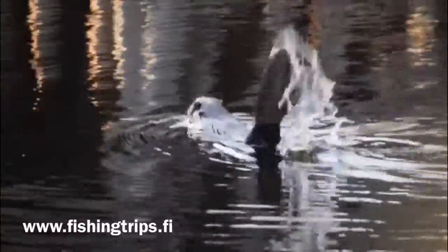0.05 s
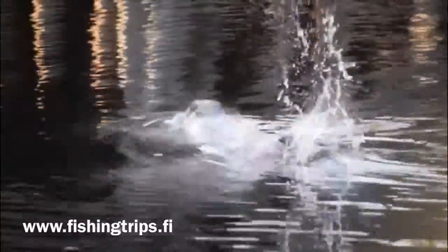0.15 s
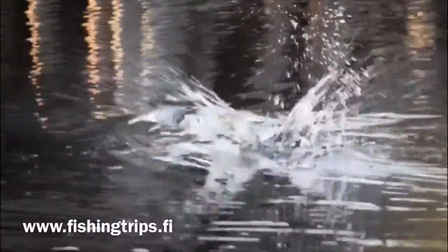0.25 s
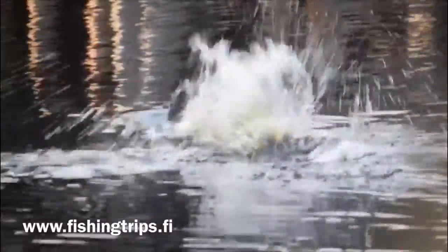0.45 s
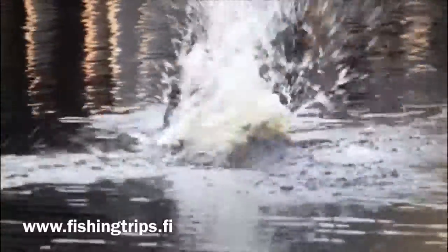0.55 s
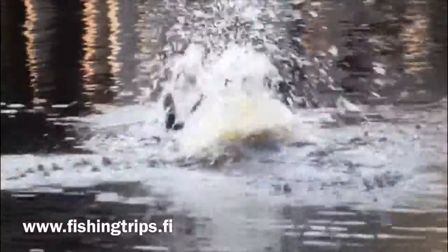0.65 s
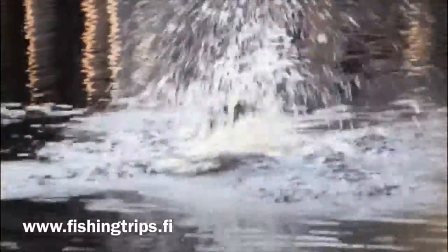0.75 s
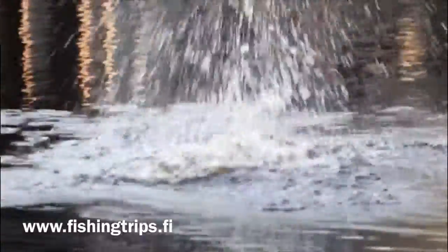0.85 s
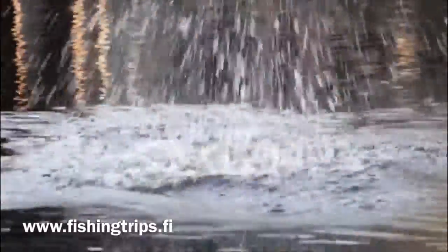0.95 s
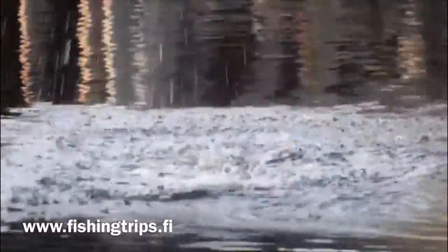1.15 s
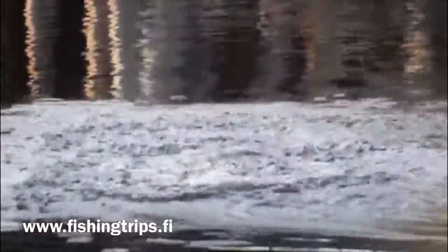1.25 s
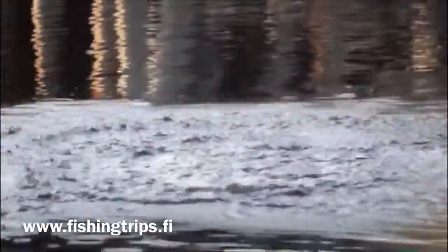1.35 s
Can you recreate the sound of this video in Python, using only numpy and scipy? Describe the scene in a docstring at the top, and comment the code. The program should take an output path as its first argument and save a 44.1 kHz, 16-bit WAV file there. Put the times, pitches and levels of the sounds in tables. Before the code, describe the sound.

One sharp slap on water as a beaver dives, then a plunge and spattering drops.

```python
"""Quiet air at a still pond: soft wind on the microphone, a few faint plunks, a small bird far off.
Then a beaver slaps its flat tail on the water, ringing the air trapped beneath, and dives.
The hollow it leaves closes with a rising gulp and the plunks of large bubbles; a column of water
shoots up and rains back as drops, bubbles and heavier lumps. The bird whistles again as it thins."""
import sys
import numpy as np
from scipy.fft import rfft, irfft, next_fast_len
from scipy.io import wavfile
from scipy.ndimage import map_coordinates

SR = 44100
rng = np.random.default_rng(int(sys.argv[2]) if len(sys.argv) > 2 else 0)


def put_to_file(sound):
    """Save the sound as 16-bit audio at rate SR, in the file named by the first command-line argument."""
    columns = np.atleast_2d(sound).T  # one column per channel
    safe = np.clip(columns, -1, 1)
    whole_steps = np.round(safe * 32767)
    wavfile.write(sys.argv[1], SR, whole_steps.astype(np.int16))


N = 61739


def amp(db):
    """Decibels to gain."""
    return 10 ** (np.asarray(db) / 20)


def unit(x):
    """x at rms 1."""
    return x / np.sqrt(np.mean(x ** 2) + 1e-20)


def since(start_s):
    """Seconds since start_s at every sample, zero before."""
    return np.maximum(np.arange(N) / SR - start_s, 0)


def curves(rows):
    """One value per sample for each column after the time."""
    times, *columns = np.transpose(rows)
    return [np.interp(np.arange(N) / SR, times, column) for column in columns]


def filtered(x, response):
    """x with its spectrum multiplied by response(hz)."""
    size = next_fast_len(N + SR // 2)
    return irfft(rfft(x, size) * response(np.fft.rfftfreq(size, 1 / SR)), size)[..., :N]


def coloured(x, colour):
    """x shaped by (freq_hz, gain_db) points on a log axis, at rms 1."""
    freq_hz, gain_db = np.transpose(colour)
    return unit(filtered(x, lambda hz: amp(np.interp(np.log(hz + 1), np.log(freq_hz), gain_db))))


def noise(colour):
    """Coloured noise of rms 1."""
    return coloured(rng.standard_normal(N), colour)


def fade(t, t60):
    """Exponential decay, 60 dB down at t60."""
    return np.exp(-np.log(1000) * t / t60)


def burst(start_s, rise_s, t60):
    """An envelope that swells quickly and dies away."""
    t = since(start_s)
    return (1 - np.exp(-t / rise_s)) * fade(t, t60)


def push(centre_s, hz, cycles):
    """One short pressure swing."""
    turns = (since(0) - centre_s) * hz
    return np.exp(-(turns / cycles) ** 2) * np.sin(2 * np.pi * turns)


def glide(rows, edge_s, blur_rad=0):
    """A soft-ended sine following (time_s, pitch_hz, level_db) rows; blur_rad shakes its phase."""
    hz, db = curves(rows)
    gate = np.clip(np.minimum(since(rows[0][0]), rows[-1][0] - since(0)) / edge_s, 0, 1)
    return gate * amp(db) * np.sin(2 * np.pi * np.cumsum(hz) / SR + blur_rad)


def shower(per_s, low_hz, high_hz, cycles, spread_db, chirp=.12):
    """Damped, rising sines of random time, pitch and size, at rms 1."""
    when, pitch, size, polarity = np.hsplit(rng.random((int(per_s * N / SR), 4)), 4)
    hz = low_hz * (high_hz / low_hz) ** pitch
    t, t60 = np.arange(SR // 40) / SR, cycles / hz
    gain = amp(-spread_db * np.log(np.maximum(size, .02))) * np.sign(polarity - .5)
    rings = gain * fade(t, t60) * np.sin(2 * np.pi * hz * t * (1 + chirp * t / t60))
    index = (when * N).astype(int) + np.arange(len(t))
    return unit(np.bincount(index.ravel(), rings.ravel(), N)[:N])


def panned(x, left_db):
    """x on two channels, left_db louder on the left."""
    return x * amp([[left_db / 2], [-left_db / 2]])


# Open air around the pond: freq_hz, gain_db
AIR_COLOUR = [(20, -27), (70, -17), (130, -7), (240, 7), (700, -0.5), (3000, -3), (5000, -16.5),
              (11000, -28)]
def air(level_db=-64):
    """Quiet outdoor air, unrelated between the left and right microphone ports."""
    return amp(level_db) * np.array([noise(AIR_COLOUR) for port in "LR"])


# Bubbling, fine spray and the churn underneath: freq_hz, gain_db
BUBBLING_COLOUR = [(40, -45), (440, -20), (580, -6), (700, 2), (930, -3), (1300, 5.5), (1700, 5.5),
                   (2300, 0.5), (3200, -11.5), (4500, -9), (8000, -50)]
FIZZ_COLOUR = [(1200, -12.5), (2500, 0.5), (4100, 0), (5000, -3.5), (10000, -11), (11500, -24)]
CHURN_COLOUR = [(40, -20), (130, -11), (220, 6), (400, 8.5), (550, 12.5), (900, -26.5)]
# Water out on the pond, faint until the slap: time_s, level_db, relative_fizz_db, relative_churn_db
SPRAY_LEVELS = [(0, -61.5, 2, -7.5), (.225, -60.5, -0.5, -10.5), (.245, -43.5, -1, -29),
                (.29, -52.5, 0.5, -25), (.34, -48.5, -1, -28), (.40, -57, -1, -37),
                (.455, -52.5, -2.5, -12), (.475, -41.5, -7, -8), (.51, -42, -13, -25), (.55, -40, -8, -7.5),
                (.62, -43.5, -11.5, -5.5), (.69, -40, -12, -11.5), (.74, -43.5, -8.5, -17),
                (.87, -41, -8.5, -21.5), (.925, -40, -8.5, -27), (.965, -46, -5, -13),
                (1.09, -45.5, -4, -26), (1.17, -49.5, -1, -43), (1.3, -51, -3.5, -27),
                (1.36, -59, 3.5, -28)]
def spray():
    """Falling water: countless bubbles and fine drops over a wash of noise and a low churn."""
    level_db, fizz_db, churn_db = curves(SPRAY_LEVELS)
    bubbles = shower(per_s=2200, low_hz=448.6, high_hz=3466, cycles=21.1, spread_db=2)
    drops = shower(per_s=1600, low_hz=1960, high_hz=11100, cycles=5, spread_db=4)
    bubbling = unit(coloured(bubbles, BUBBLING_COLOUR) + amp(-7) * noise(BUBBLING_COLOUR))
    fizz = unit(coloured(drops, FIZZ_COLOUR) + amp(-2) * noise(FIZZ_COLOUR))
    return amp(level_db) * (bubbling + amp(fizz_db) * fizz + amp(churn_db) * noise(CHURN_COLOUR))


# Single large bubbles in the pond: start_s, pitch_hz, level_db, t60_s
LARGE_BUBBLES = [(.001, 687, -46, 0.091), (.037, 1327, -45, 0.051), (.172, 1450, -45, 0.033),
                 (.533, 760, -27, 0.027), (.539, 654, -16, 0.019), (.538, 1413, -28, 0.042),
                 (.549, 1295, -27.5, 0.033), (.554, 560, -27.5, 0.051), (.574, 1458, -31, 0.047),
                 (.592, 338, -31, 0.096), (.596, 732, -25, 0.042), (.602, 207, -30.5, 0.079),
                 (.627, 604, -33.5, 0.064), (.649, 540, -27.5, 0.032), (.66, 730, -35, 0.091),
                 (.689, 1220, -35, 0.073), (.749, 2240, -31.5, 0.035), (.886, 1208, -23.5, 0.035),
                 (.935, 530, -20, 0.022), (.9355, 763, -24, 0.031), (.9365, 1117, -23.5, 0.02),
                 (0.9361, 1446, -20.5, 0.021), (1.078, 632, -41.5, 0.037), (1.195, 1290, -35.5, 0.031),
                 (1.225, 778, -36.5, 0.041), (1.269, 1340, -32, 0.03), (1.289, 1270, -33.5, 0.028)]
def plunks(rise_s=0.0015, climb_octaves=.2):
    """Large bubbles ring briefly, rising in pitch as they near the surface."""
    out = np.zeros(N)
    for start_s, hz, db, t60 in LARGE_BUBBLES:
        t = since(start_s)
        pitch_hz = hz * 2 ** (climb_octaves * np.minimum(t / t60, 1)) * (t > 0)
        out += amp(db) * burst(start_s, rise_s, t60) * np.sin(2 * np.pi * np.cumsum(pitch_hz) / SR)
    return out


# Wind right on the microphone: start_s, level_db
WIND_PUFFS = [(.006, -41), (0.045, -52.5)]
# Its low rumble: freq_hz, gain_db
WIND_COLOUR = [(20, -8), (60, -12), (140, -8), (400, -50)]
def wind(rise_s=0.0036, t60_s=0.083, own_gain=0.71):
    """Two soft puffs blow across the microphone ports, which partly share the rumble."""
    gust = sum(amp(db) * burst(start_s, rise_s, t60_s) for start_s, db in WIND_PUFFS)
    shared = noise(WIND_COLOUR)
    return gust * np.array([unit(shared + own_gain * noise(WIND_COLOUR)) for port in "LR"])


# A soft low bump of wind on the microphone, then water shoved or landing, left and right: time_s, push_db,
# push_hz, spatter_db, spatter_left_db
THUMPS = [(0.01, -45, 122, -71, 5), (.464, -31, 650, -35.5, -1), (0.468, -41, 133, -58, 0),
          (0.479, -31.5, 770, -39.5, 2), (.540, -39.5, 323, -53, 0), (.594, -24.5, 445, -43, -2),
          (.888, -34, 1500, -36.5, 1.5), (0.9156, -24.5, 1350, -34, -2.5),
          (0.9355, -23.5, 544, -32, -5), (0.939, -18.5, 1290, -30.5, -5)]
# The spatter it throws: freq_hz, gain_db
SPATTER_COLOUR = [(60, -40), (300, -4), (950, 0.5), (2900, 5), (4000, -14), (10000, -15.5), (11500, -27)]
def thumps(push_cycles=0.59, rise_s=0.00069, t60_s=0.028):
    """Each row gives one short push and a spatter, thrown to one side or straight up: first a soft low bump of
    wind on the microphone, then lumps of water."""
    out, spatter = np.zeros((2, N)), noise(SPATTER_COLOUR)
    for time_s, push_db, push_hz, spatter_db, left_db in THUMPS:
        out += amp(push_db) * push(time_s, push_hz, push_cycles)
        out += panned(amp(spatter_db) * burst(time_s, rise_s, t60_s) * spatter, left_db)
    return out


# Single drops close to the microphone: start_s, level_db, pitch_hz
NEAR_DROPS = [(0.036, -45, 4150), (0.047, -40, 2530), (.159, -46.5, 4250), (0.4161, -38.5, 3830),
              (.506, -32.5, 2030), (0.694, -44, 7200), (.790, -49, 7400), (0.8595, -32.5, 2630),
              (0.981, -39.5, 3580), (1.0954, -37.5, 2920), (1.170, -39.5, 6900), (1.322, -42, 5370),
              (1.376, -44.5, 7830), (1.390, -44.5, 5830)]
def near_drops(rise_s=0.0002, t60_s=0.017, half_width_octaves=0.22):
    """Each drop lands with a tiny dry crack in a band around its own pitch."""
    out = np.zeros(N)
    for start_s, db, pitch_hz in NEAR_DROPS:
        white = rng.standard_normal(N)
        crack = filtered(white, lambda hz: 1 / (1 + (np.log2((hz + 1) / pitch_hz) / half_width_octaves) ** 2))
        out += amp(db) * burst(start_s, rise_s, t60_s) * unit(crack)
    return out


# A small bird far off, one list a note: time_s, pitch_hz, level_db
BIRD_NOTES = [
    [(.098, 4180, -64), (.115, 4240, -56.5), (.155, 4100, -56)],
    [(.16, 3460, -58), (.2, 4000, -59)],
    [(1.16, 4150, -58), (1.205, 4200, -51), (1.232, 4480, -51), (1.243, 5180, -58), (1.265, 6000, -66)],
    [(1.245, 3350, -52), (1.266, 3560, -52.5)],
    [(1.303, 3600, -56), (1.37, 3780, -64)],
]
def bird(flutter_per_s=250, flutter_db=3.5, blur_rad=.8):
    """Thin distant whistles, blurred into a twitter by their way through the trees."""
    position = since(0) * flutter_per_s
    knots = rng.standard_normal((2, int(position[-1]) + 4))
    flutter, blur = (map_coordinates(row, [position]) for row in knots)
    whistles = sum(glide(note, edge_s=0.001, blur_rad=blur_rad * blur) for note in BIRD_NOTES)
    return amp(flutter_db * flutter) * whistles


# The crack of the tail on the pond's surface: freq_hz, gain_db
CRACK_COLOUR = [(60, -48), (200, -24), (560, -18.5), (700, 7.5), (950, -12.5), (1200, -1.5), (2400, -0.5),
                (3200, -13.5), (4200, -12), (4900, -24.5), (8500, -18.5), (11500, -33.5)]
def tail_slap(start_s=.2283, attack_s=0.0024, hold_s=0.0063, crack_db=-23, blow_db=-16.5):
    """The tail meets the water over a few milliseconds, with one hard blow as it lands flat."""
    t = since(start_s)
    decay = fade(since(start_s + hold_s), t60=0.026) + amp(-25.5) * fade(t, t60=0.16)
    crack = amp(crack_db) * np.minimum(t / attack_s, 1) * decay * noise(CRACK_COLOUR)
    blow = amp(blow_db) * push(centre_s=.2326, hz=1400, cycles=0.93)
    return crack + blow


# Resonances of the air under the tail: pitch_hz, level_db, t60_s
POCKET_MODES = [(726, -15.5, 0.029), (1175, -17.5, 0.028), (1590, -22, 0.02), (2090, -22, 0.022),
                (2320, -30, 0.016)]
def air_pocket(start_s=.2295, swell_s=0.0019, low_cut_hz=550):
    """Air squeezed beneath the tail rings, its sound kept above a steep low cut."""
    t = since(start_s)
    ring = sum(amp(db) * fade(t, t60) * np.sin(2 * np.pi * hz * t) for hz, db, t60 in POCKET_MODES)
    swell = (1 - np.exp(-t / swell_s)) ** 2
    return filtered(swell * ring, lambda hz: 1 - 1 / (1 + (hz / low_cut_hz) ** 14))


# Hollows where the beaver dives, a small one then the deep one: time_s, pitch_hz, level_db
HOLLOWS = [
    [(.412, 740, -41), (.422, 842, -44.5), (.447, 1290, -55)],
    [(.47, 40.7, -64), (.54, 54.7, -57), (.58, 113.3, -50), (.6, 163, -53)],
]
def gulps():
    """Each hollow in the water rises in pitch as it closes."""
    return sum(glide(hollow, edge_s=0.0066) for hollow in HOLLOWS)


def scene():
    """The splash sits almost straight ahead of the microphone, in wide quiet air."""
    centre = spray() + plunks() + near_drops() + bird() + tail_slap() + air_pocket() + gulps()
    return air() + wind() + thumps() + panned(centre, left_db=-0.5)


def record(dry, low_cut_hz=53, top_hz=11750):
    """The camera's microphone drops the deepest bass and keeps nothing above its band limit."""
    return filtered(dry, lambda hz: (1 - np.exp(-(hz / low_cut_hz) ** 4)) * (hz < top_hz))


dry = scene()
out = record(dry)
put_to_file(out)
```